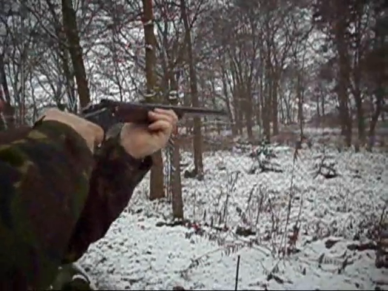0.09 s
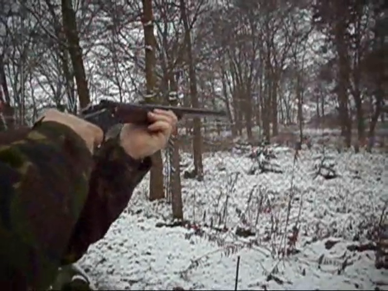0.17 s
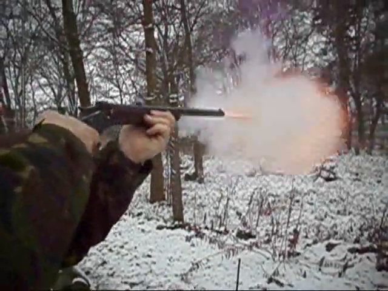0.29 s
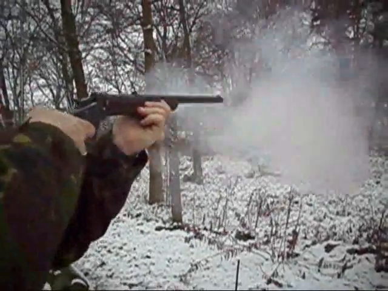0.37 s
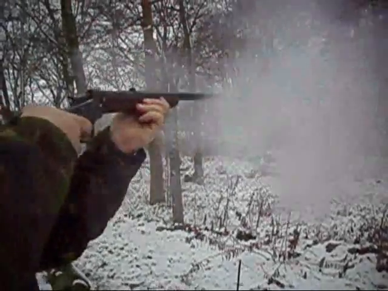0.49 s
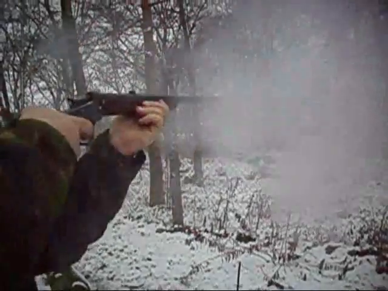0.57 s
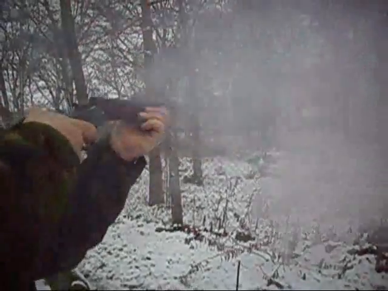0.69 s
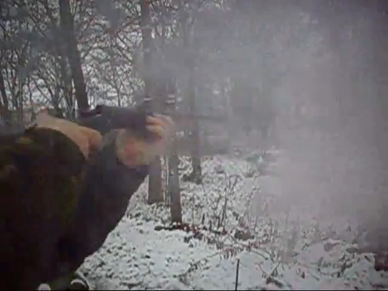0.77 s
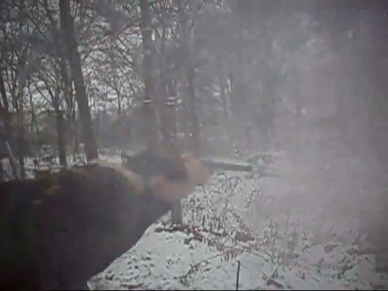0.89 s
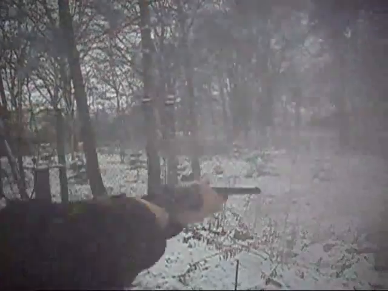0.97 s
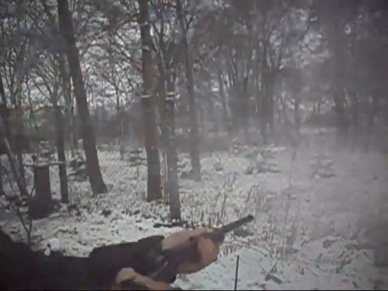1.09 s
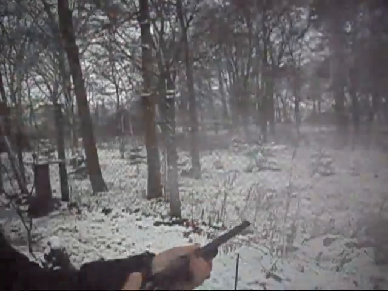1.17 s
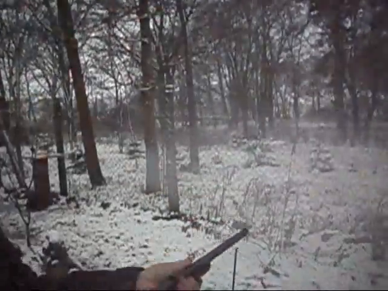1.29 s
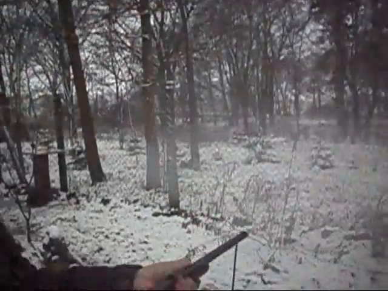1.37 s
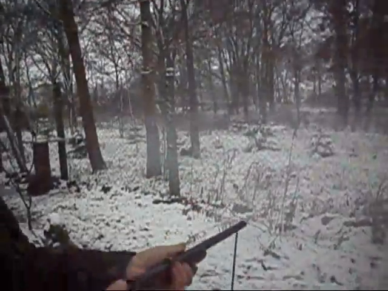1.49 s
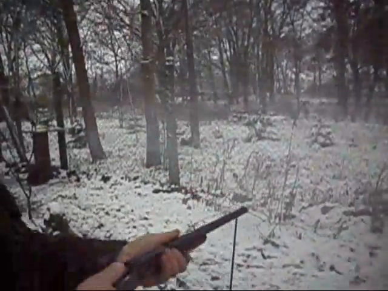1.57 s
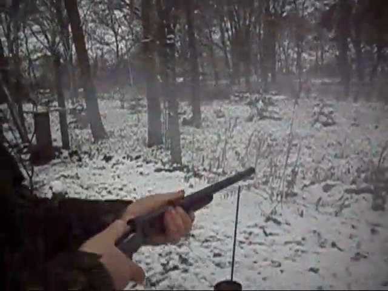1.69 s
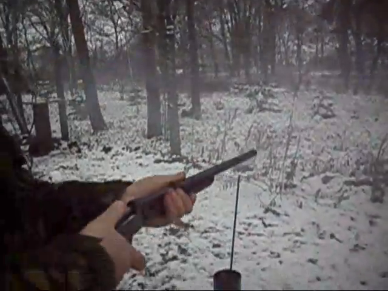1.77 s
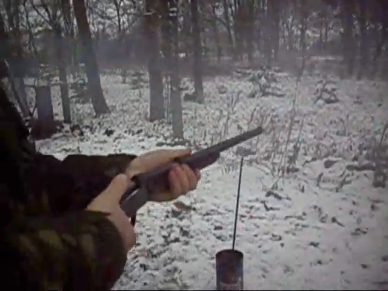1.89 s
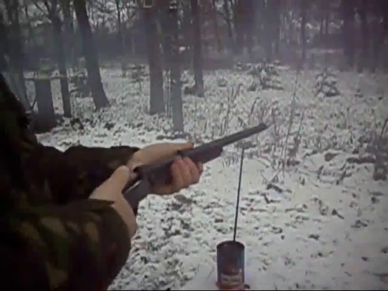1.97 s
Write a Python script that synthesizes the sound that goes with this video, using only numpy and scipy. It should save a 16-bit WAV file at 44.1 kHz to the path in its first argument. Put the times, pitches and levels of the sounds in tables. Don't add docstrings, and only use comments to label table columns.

```python
import sys
import numpy as np
from scipy import signal
from scipy.fft import rfft, irfft
from scipy.io import wavfile
from scipy.ndimage import uniform_filter1d

SR = 44100
rng = np.random.default_rng(int(sys.argv[2]) if len(sys.argv) > 2 else 0)


def dump_mix(stems):
    frames = np.atleast_2d(stems).T
    limited = np.clip(frames, -1, 1)
    pcm = np.round(limited * 32767).astype(np.int16)
    wavfile.write(sys.argv[1], SR, pcm)


def ratio_of_db(decibels):
    return 10 ** (np.asarray(decibels, float) / 20)


N = 90405
T = np.arange(N) / SR


def evened(x):
    return x / np.sqrt(np.mean(x ** 2) + 1e-20)


def read_spectrum(points, hz):
    point_hz, level_db = np.transpose(points)
    return np.interp(np.log(hz + 1), np.log(point_hz + 1), level_db, right=-100)


def curve(points):
    time_s, value = np.transpose(points)
    return np.interp(T, time_s, value)


def drift(span):
    noise = rng.standard_normal(N)
    return evened(uniform_filter1d(uniform_filter1d(noise, span), span))


# time_s, level_db (re full scale)
ECHO_LEVEL = [(.2985, -22), (.3012, -17), (.3022, 4.5), (.3075, 7.5), (.311, 23), (.322, 30), (.345, 28),
              (.356, 17.5), (.41, 13.5), (.45, 5), (.53, 1), (.548, -8), (.62, -8), (.775, -13.5),
              (.815, -15.5), (.88, -15), (1.45, -30), (1.76, -39.5)]
# frequency_hz, level_db (per Hz)
NEAR_COLOUR = [(40, -24.5), (90, -2), (300, -2), (600, 0), (1100, -1), (1500, -8), (3900, -16),
               (5000, -50.5)]
# frequency_hz, level_db (per Hz)
FAR_COLOUR = [(90, -42), (200, -11), (420, -11.5), (560, -1.5), (1080, -1), (1330, -12), (3900, -27),
              (5000, -60)]
# time_s, change_db (negative dips), length_s
SWELLS_AND_DIPS = [(0.3147, -8.5, 0.0016), (.329, -18.5, 0.0023), (0.3336, -11, 0.00087), (0.3376, 14.5, .003),
                   (0.348, 8, 0.0019), (.352, -13, 0.0018), (0.363, -5.5, 0.0032), (.399, 14, 0.0012),
                   (0.359, 10.5, .0015), (0.3826, 15, .0015), (.404, 14, 0.0028), (.553, 6.5, 0.0012),
                   (.558, -3, .002), (.565, 11, 0.0018), (.572, -1, .004), (0.603, 0, 0.0034),
                   (.628, 10.5, .001), (0.644, 1.5, 0.0063), (0.681, 3.5, 0.0018), (0.775, 2.5, .012),
                   (.82, -2, 0.012), (0.879, 1, 0.0098), (1.026, -2.5, 0.074), (1.04, 5, 0.004),
                   (1.053, 7, 0.0022), (1.155, 0.5, 0.039), (1.397, 2, .03), (1.609, 0.5, 0.011),
                   (1.933, 1.5, 0.036)]


def blast_and_echo():
    hop, size = 256, 1024
    darken_from_s, darken_s = 0.55, 0.33
    patch_db, flicker_db = 1.13, 0.77
    frames, hz = N // hop + 5, np.fft.rfftfreq(size, 1 / SR)
    real, imaginary, patches = rng.standard_normal((frames, len(hz), 3)).T
    patches = evened(uniform_filter1d(uniform_filter1d(patches, 8, 0), 5, 1))

    late_s = np.maximum(np.arange(frames) * hop / SR - darken_from_s, 0)
    far = 1 - np.exp(-late_s / darken_s)
    near_db = read_spectrum(NEAR_COLOUR, hz)[:, None]
    far_db = read_spectrum(FAR_COLOUR, hz)[:, None]
    colour = ratio_of_db((1 - far) * near_db + far * far_db)
    colour = colour / np.sqrt((colour ** 2).sum(0))
    spectrum = (real + 1j * imaginary) * colour * ratio_of_db(patch_db * patches)
    body = evened(signal.istft(spectrum, nperseg=size, noverlap=size - hop)[1][:N])

    change_db = sum(db * np.exp(-((T - s) / length) ** 2) for s, db, length in SWELLS_AND_DIPS)
    level_db = curve(ECHO_LEVEL) + change_db + flicker_db * drift(span=300)
    return body * ratio_of_db(level_db) * (T > ECHO_LEVEL[0][0])


def diaphragm_swing():
    start_s, level_db, pitch_hz, fall_60db_s = 0.305, 17, 20.32, 0.21
    since_s = np.maximum(T - start_s, 0)
    fading_db = level_db - 60 * (since_s / fall_60db_s) ** 2
    return ratio_of_db(fading_db) * np.sin(2 * np.pi * pitch_hz * since_s)


# frequency_hz, level_db (per Hz)
RUMBLE_COLOUR = [(10, -14.5), (22, -0.5), (60, -1), (105, -8.5), (170, -13.5), (400, -22.5), (900, -37),
                 (1500, -59.5)]
# time_s, level_db
RUMBLE_LEVEL = [(0, -36), (.18, -37), (.24, -32.5), (.3, -28), (.55, -16.5), (.7, -25.5), (.9, -23.5),
                (1.1, -30), (1.3, -33.5), (1.55, -32.5), (1.64, -29), (1.75, -33), (1.95, -38), (2.05, -41.5)]
# time_s, height (signed, full scale 1),
# width_s
LOW_PUSHES = [(.21, 0.079, 0.0076), (.226, .18, .0035), (0.2366, -0.47, 0.0016), (.24, -0.12, 0.0028),
              (0.2482, .3, 0.0022), (.267, -.1, .003), (.274, .1, .003), (.297, .1, 0.009),
              (.51, 0.71, 0.0039), (.517, -.6, 0.0032), (.561, 0.33, 0.002), (0.573, -0.41, 0.0053),
              (.579, 0.33, .004), (0.636, 0.31, .003), (0.685, 0.32, .003), (0.699, -0.29, .003),
              (0.721, 0.12, .004), (0.874, -0.11, .004), (0.843, -.25, 0.0026), (0.849, .2, 0.0051),
              (1.628, 0.15, 0.0071), (1.64, 0.023, 0.0028), (1.8, 0.085, 0.0034)]


def wind_and_boom():
    lump_db = 1.86
    hz = np.fft.rfftfreq(N, 1 / SR)
    noise = rfft(rng.standard_normal(N))
    rumble = evened(irfft(noise * ratio_of_db(read_spectrum(RUMBLE_COLOUR, hz)) * (hz > 12), N))
    buffets = sum(h * np.exp(-abs((T - s) / width) ** 1.75) for s, h, width in LOW_PUSHES)
    return rumble * ratio_of_db(curve(RUMBLE_LEVEL) + lump_db * drift(span=1500)) + buffets


# pitch_hz, level_db (rms)
MOTOR_TONES = [(812.9, -55), (1626, -63.5)]


def camera_noise():
    hiss_db = -58
    whine = sum(np.sqrt(2) * ratio_of_db(db) * np.sin(2 * np.pi * hz * T) for hz, db in MOTOR_TONES)
    return whine + ratio_of_db(hiss_db) * rng.standard_normal(N)


def scene():
    return (blast_and_echo() + diaphragm_swing() + wind_and_boom() + camera_noise())[None]


CONVERTER_KNEE = [(0, 0), (.93, .93), (1.8, .992), (2.3, 1.1), (3.0, 1.62), (3.7, 2)]


def converter(dry):
    hold_hz, hold_phase, steps = 8006.82, 0.747, 128
    sag_depth, sag_rise_s, sag_fall_s = -0.15, 0.07, 0.62
    pinned_sag, pinned_ripple = 0.54, 0.025

    tick = np.floor(np.arange(N) * hold_hz / SR + hold_phase)
    first = np.searchsorted(tick, tick)
    since_s = np.maximum(first / SR - ECHO_LEVEL[0][0], 0)
    sag = sag_depth * (1 - np.exp(-since_s / sag_rise_s)) * np.exp(-since_s / sag_fall_s)
    held = dry[:, first] + sag

    bent = np.sign(held) * np.interp(abs(held), *np.transpose(CONVERTER_KNEE))
    pinned = abs(held) > CONVERTER_KNEE[-1][0]
    unrest = pinned_ripple * rng.standard_normal(N)[first]
    bent = bent + pinned * (pinned_sag * sag + unrest)
    wrapped = (bent + 1) % 2 - 1
    return np.floor(wrapped * steps) / steps


def top_cut(x):
    return signal.sosfilt(signal.butter(12, 15670, fs=SR, output="sos"), x)


def record(dry):
    edge_hz = 15800
    low_pass = signal.firwin(511, edge_hz, window=("kaiser", 9), fs=SR)
    mix = signal.oaconvolve(converter(dry), low_pass[None], "same")
    return top_cut(mix)


dry = scene()
out = record(dry)
dump_mix(out)
```